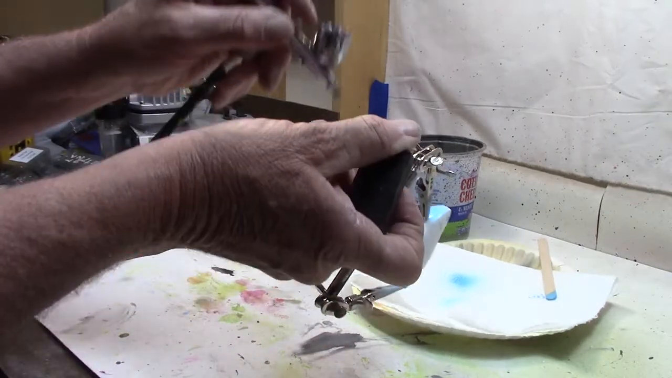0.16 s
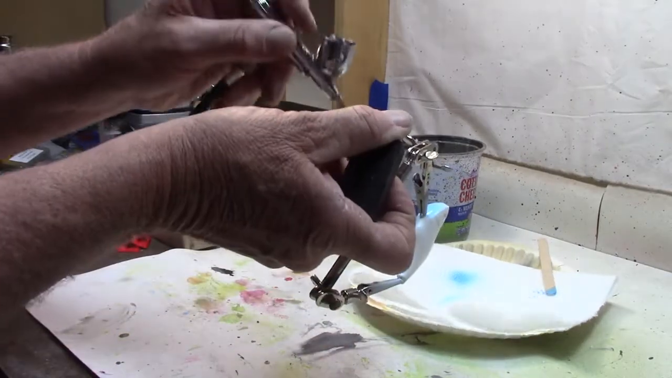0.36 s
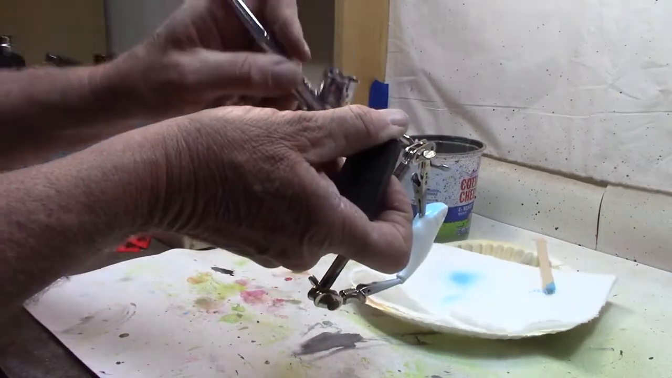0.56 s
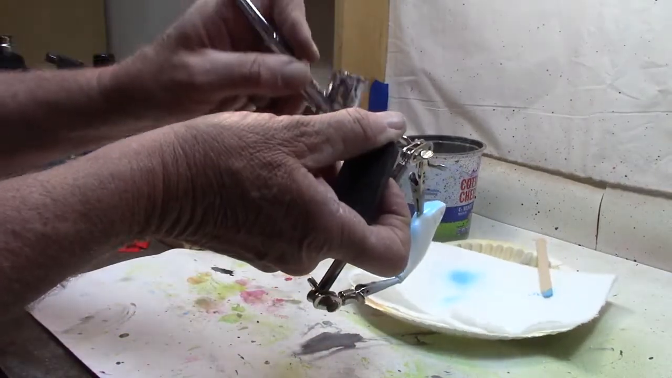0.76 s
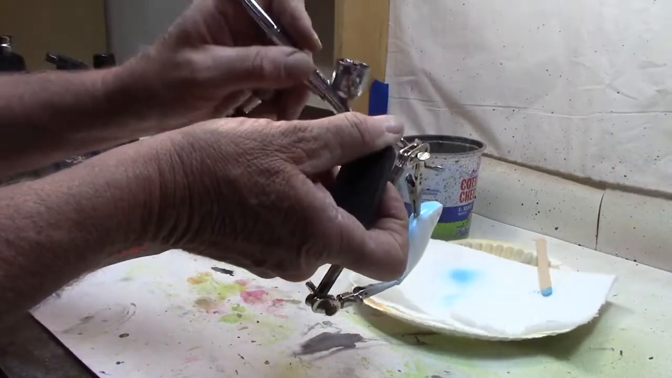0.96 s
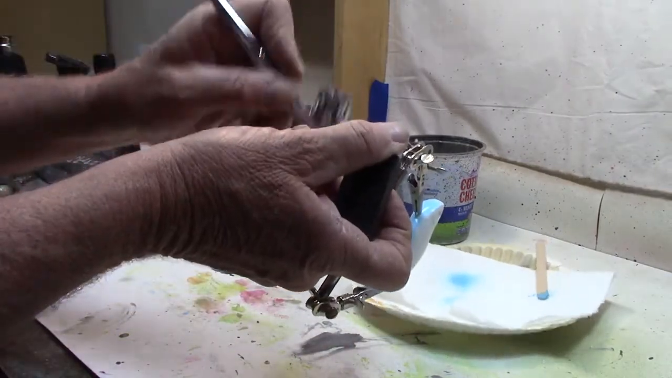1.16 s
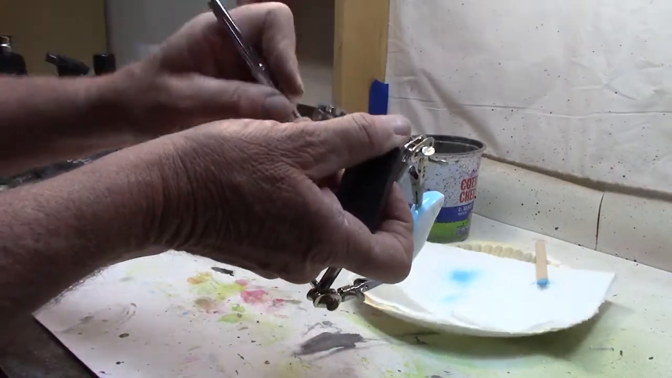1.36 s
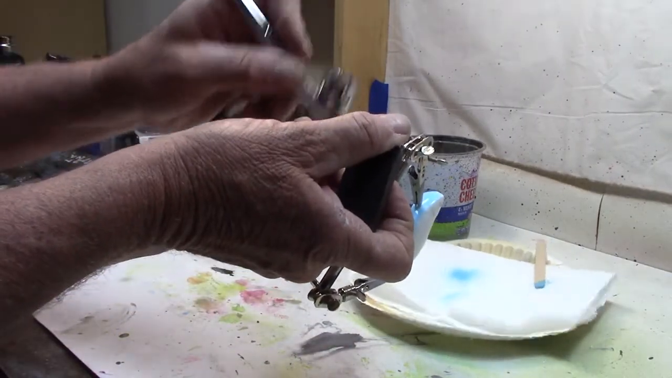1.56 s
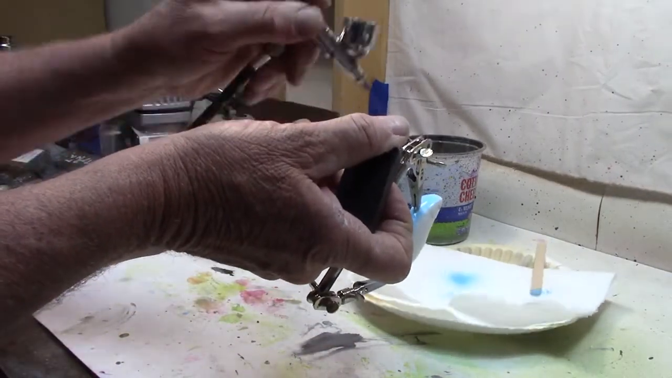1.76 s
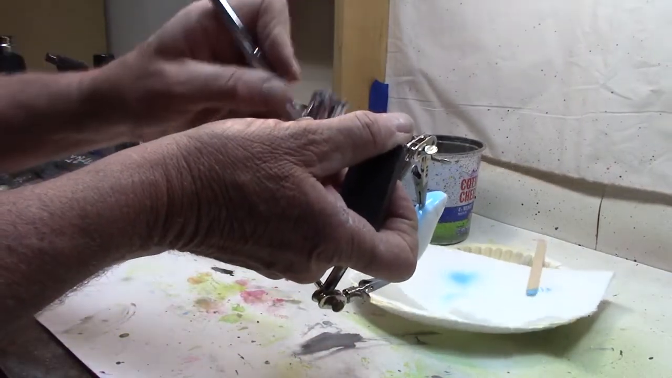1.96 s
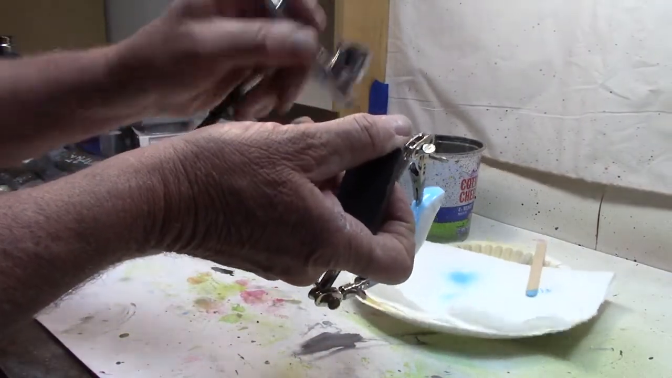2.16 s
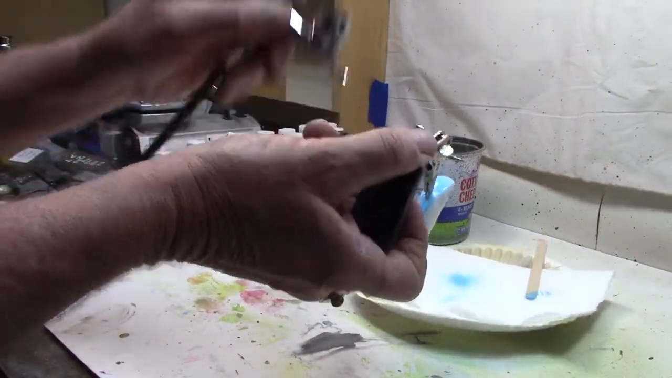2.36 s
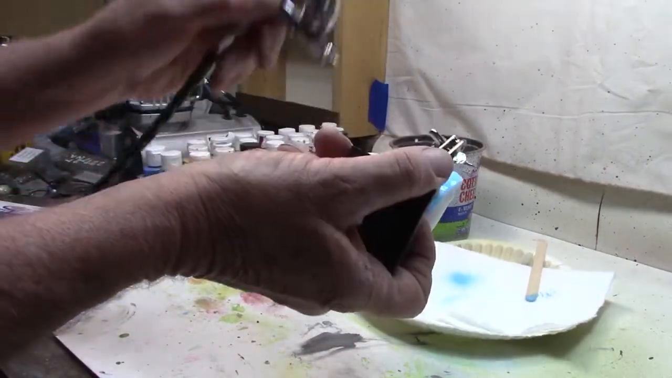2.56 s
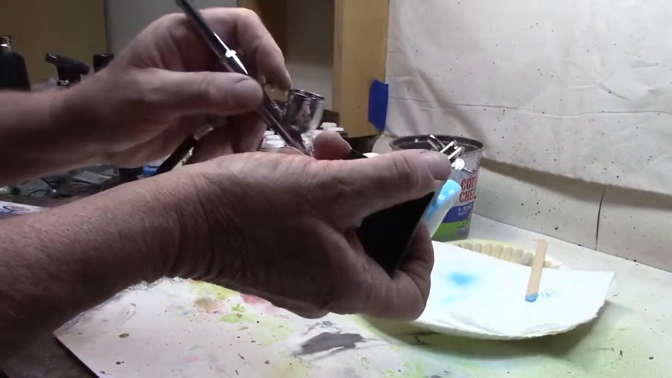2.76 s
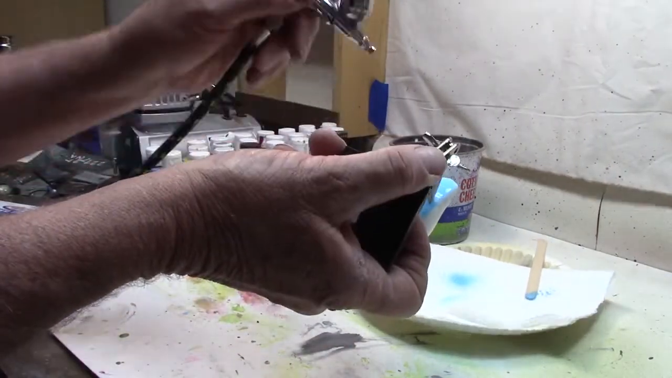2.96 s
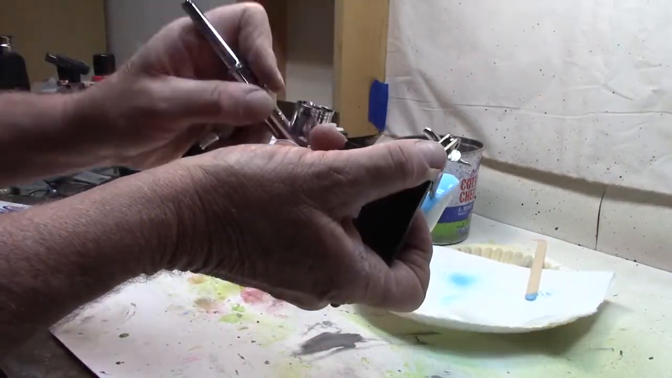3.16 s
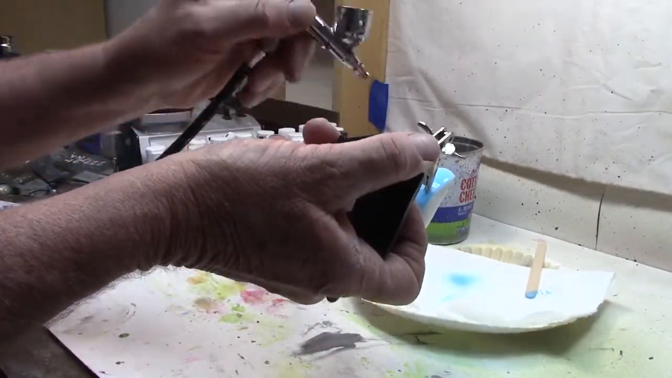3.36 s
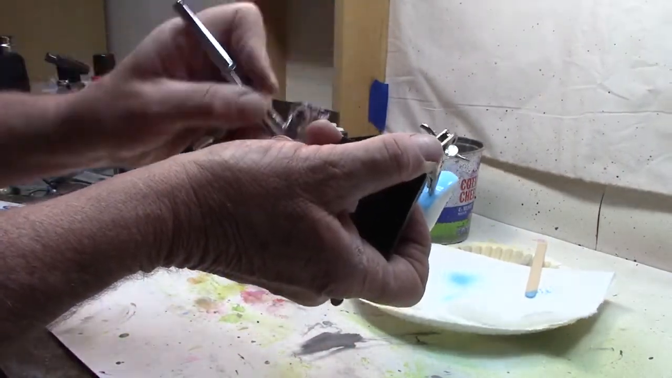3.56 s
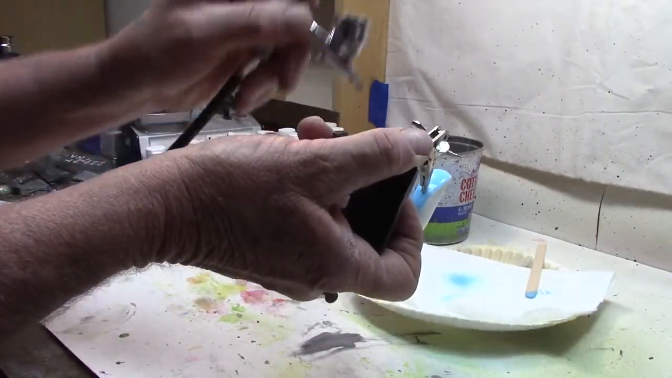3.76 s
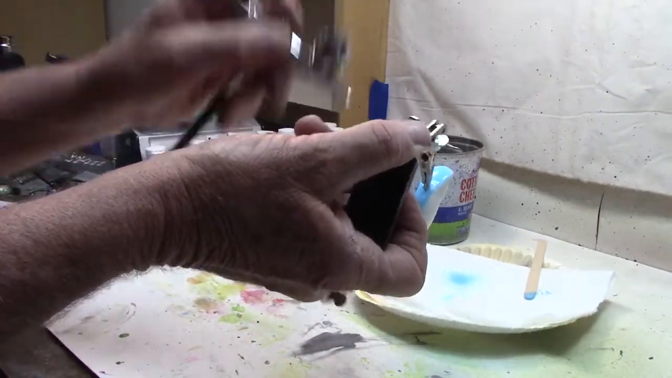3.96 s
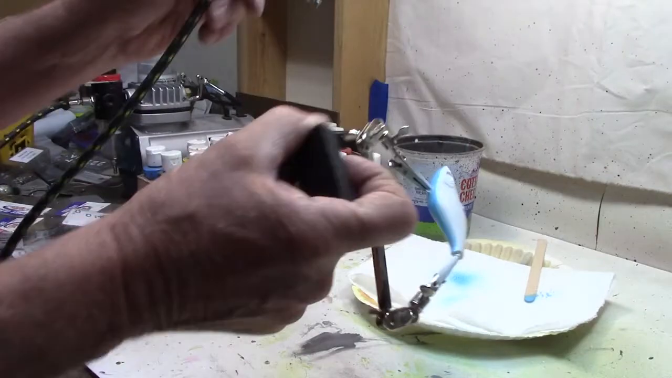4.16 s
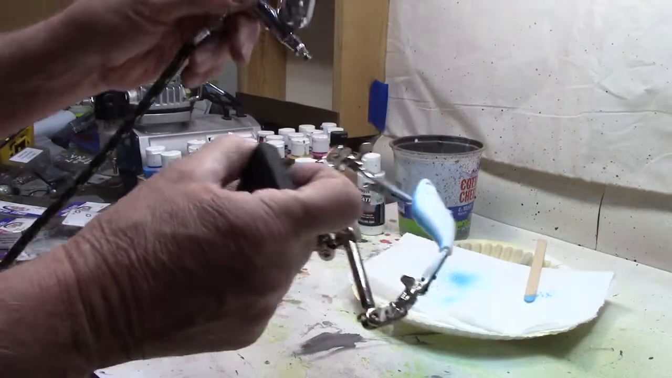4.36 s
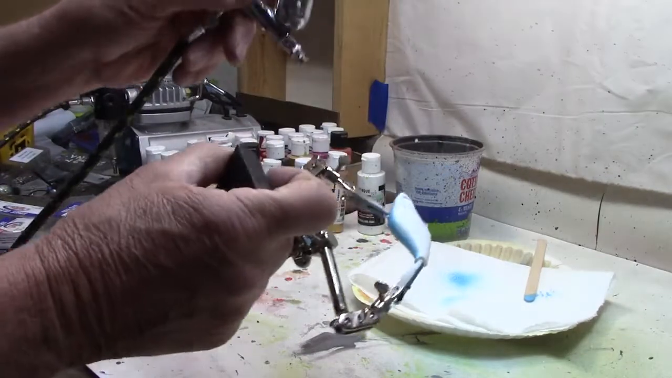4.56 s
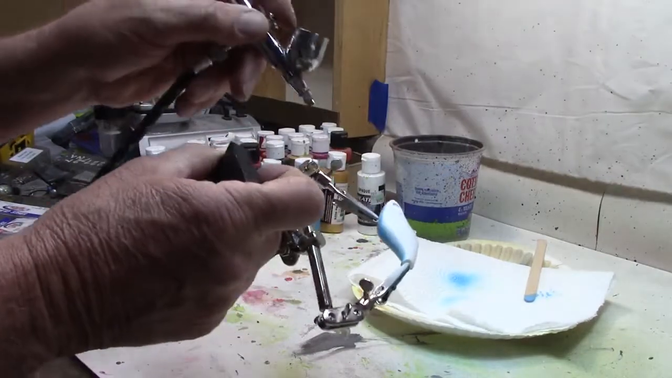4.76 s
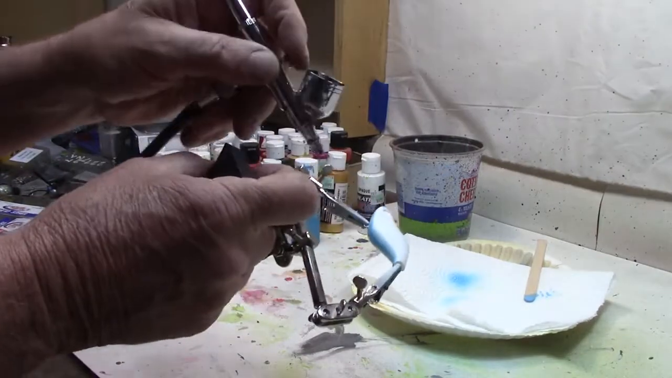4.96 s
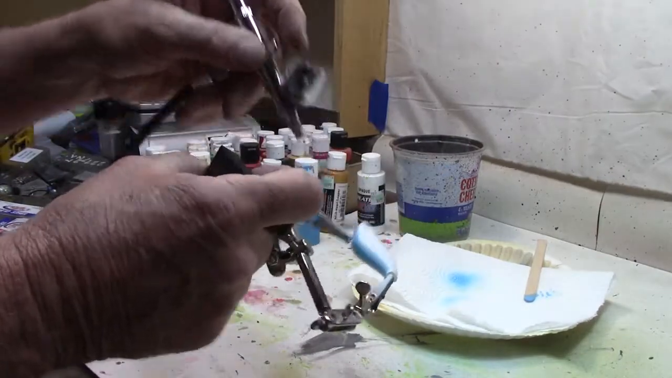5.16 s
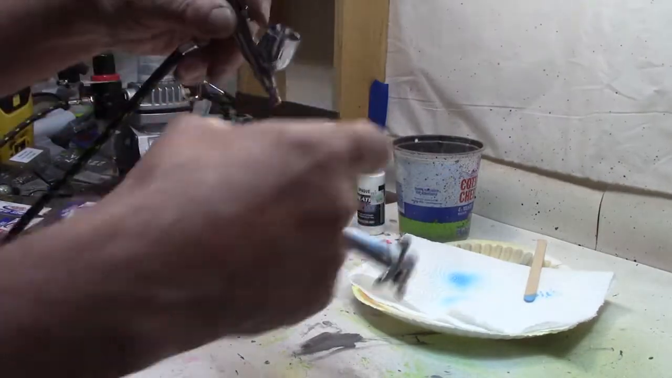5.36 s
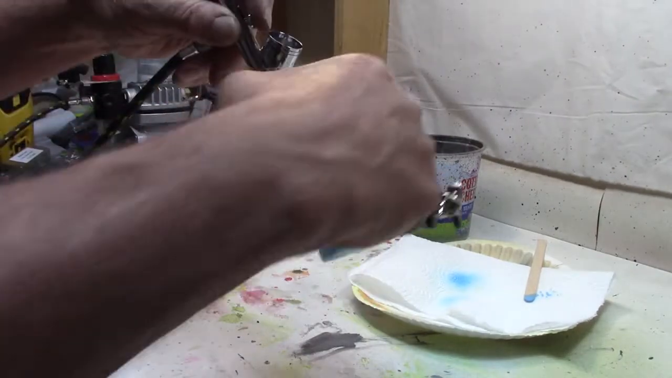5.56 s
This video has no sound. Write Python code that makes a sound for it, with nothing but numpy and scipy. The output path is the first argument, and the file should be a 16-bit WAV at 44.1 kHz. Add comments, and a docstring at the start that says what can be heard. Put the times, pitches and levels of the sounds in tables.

```python
"""Compressor and airbrush

A small piston compressor chugs beside a workbench: each turn of its crank thumps the housing, rings
the air line and puffs through the valves. An airbrush hisses two long bursts at a part held in the
hand, and its trigger snaps back after each. Then the motor is switched off, the piston coasts through
a few slow strokes and a metal clamp clicks as it is put down."""
import sys
import numpy as np
from scipy import signal
from scipy.fft import rfft, irfft, next_fast_len
from scipy.io import wavfile
from scipy.ndimage import uniform_filter1d

SR = 44100
rng = np.random.default_rng(int(sys.argv[2]) if len(sys.argv) > 2 else 0)


def wrap_up_sound(samples):
    """Save the sound to the file named by the first command line argument, as 16-bit audio."""
    columns = np.atleast_2d(samples).T
    # keep every value between -1 and 1, then stretch to whole-number steps
    tamed = np.clip(columns, -1, 1)
    steps = np.round(tamed * 32767).astype(np.int16)
    wavfile.write(sys.argv[1], SR, steps)


N = 246959
TIME = np.arange(N) / SR
OPPOSITE = np.array([[1], [-1]])  # adds to the left channel, subtracts from the right


def from_db(db):
    """Turn decibels into a gain."""
    return 10 ** (np.asarray(db) / 20)


def rms_one(x):
    """Scale a signal to an average power of 1."""
    return x / np.sqrt(np.mean(x ** 2) + 1e-20)


def in_time(rows):
    """Join timed rows with straight lines, giving one curve for each column after the time."""
    times, *columns = np.transpose(rows)
    return [np.interp(TIME, times, column) for column in columns]


def swells(rows):
    """Smooth bumps, each with its own middle, half length and height."""
    return sum(height * np.exp(-((TIME - middle) / half) ** 2) for middle, half, height in rows)


def dying(start, t60):
    """A level that jumps to 1, then falls 60 dB in t60 seconds."""
    return (TIME >= start) * from_db(-60 * np.clip((TIME - start) / t60, 0, 3))


def noise(colour):
    """Noise of power 1, shaped by rows of frequency and relative level."""
    hz, db = np.transpose(colour)
    size = next_fast_len(N)
    freqs = np.fft.rfftfreq(size, 1 / SR) + 1
    roll_off = 1 / (1 + (hz[0] / 2 / freqs) ** 4) / (1 + (freqs / hz[-1] / 2) ** 4)
    gain = roll_off * from_db(np.interp(np.log(freqs), np.log(hz), db))
    return rms_one(irfft(gain * rfft(rng.standard_normal(size)))[:N])


def ring(drive, hz, t60):
    """Two coupled resonators: a click swells into a tone and dies away. The pitch may move."""
    spin = np.exp(2j * np.pi * np.cumsum(hz * np.ones(N)) / SR)
    decay = from_db(-60 / (t60 * SR))
    envelope = signal.lfilter([np.e * (1 - decay)], [1, -2 * decay, decay * decay], drive / spin + 1e-18)
    return np.real(spin * envelope)


def air_ring(hz, t60):
    """A tone of power 1, kept ringing by rushing air."""
    return rms_one(ring(rng.standard_normal(N), hz, t60))


def strokes(turns, angle, uneven_db):
    """One click each time the crank passes an angle; uneven_db varies their strength."""
    clicks = np.diff(np.floor(turns - angle), prepend=np.floor(turns[0] - angle))
    clicks[clicks > 0] = from_db(uneven_db * rng.standard_normal(np.count_nonzero(clicks)))
    return clicks


def knocks(turns, force, tones, uneven_db):
    """Tones struck once a turn, each at its own crank angle."""
    return sum(from_db(db) * ring(force * strokes(turns, angle, uneven_db), hz, t60)
               for angle, hz, t60, db in tones)


def puff(turns, opens, peak_after, uneven_db):
    """Flow through a valve that opens once a turn: it swells to about 1 and dies away."""
    count, age = np.divmod(turns - opens + 1, 1)
    strength = from_db(uneven_db * rng.standard_normal(size=200))[count.astype(int)]
    return strength * (age / peak_after * np.exp(1 - age / peak_after)) ** 2


TURNS_PER_S, SAG_TURNS_PER_S, START_TURNS = 27.58, 0.32, -0.332
OFF_S, STALL_S, COAST_TURNS_PER_S, BRAKE_TURNS_PER_S2 = 5.07, 5.42, 16.4, 23.5

def crank():
    """Turns so far and share of full speed: the motor sags as pressure builds, then coasts and stalls."""
    running = TURNS_PER_S - SAG_TURNS_PER_S * (TIME / OFF_S) ** 2
    coasting = (COAST_TURNS_PER_S - BRAKE_TURNS_PER_S2 * (TIME - OFF_S)) * (TIME < STALL_S)
    rate = np.where(TIME < OFF_S, running, coasting)
    speed = np.abs(uniform_filter1d(rate / TURNS_PER_S, SR // 20))
    return START_TURNS + np.cumsum(rate) / SR, speed


# The housing's thump and boom. Each row: crank angle in turns, pitch in Hz, ring time in seconds,
# relative level in dB.
HOUSING_TONES = [(-0.176, 254.7, 0.027, -29.5), (-0.23, 154.1, 0.041, -31), (-0.222, 228.5, 0.038, -27.5),
                 (-0.1993, 403, 0.061, -34), (0.0832, 250, 0.0063, -23.5)]
BOOM_TONES = [(-.25, 115, 0.039, -36.5), (-.22, 217, 0.1, -42)]
# The boom grows as the hand lifts away. Each row: middle and half length in seconds, gain.
BOOM_SWELL = [(4.8, 0.39, 1.0)]
SETTLE_DB, SETTLE_S = 3.5, 0.99

def housing(turns, speed, shade_db):
    """The piston thumps the housing, harder at first. Slow, soft blows lose their higher tones most."""
    thump = sum(knocks(turns, speed ** (hz / 215), [(angle, hz, t60, db)], uneven_db=0.55)
                for angle, hz, t60, db in HOUSING_TONES)
    thump_db = -0.5 + SETTLE_DB * np.exp(-TIME / SETTLE_S) - 0.07 * shade_db
    boom = swells(BOOM_SWELL) * knocks(turns, speed ** 3, BOOM_TONES, uneven_db=2.0)
    return from_db(thump_db) * thump + boom


def drone(turns, speed, shade_db):
    """The strokes keep a tone ringing, a little lower when shaded; rushing air makes it waver."""
    pushes = speed ** 3 * strokes(turns, angle=-0.28945, uneven_db=0.0)
    tone = from_db(-19.2 - 0.9 * shade_db) * ring(pushes, hz=582.2 - 1.75 * shade_db, t60=0.049)
    waver = from_db(-40.5 - 0.4 * shade_db) * speed ** 2.2 * air_ring(hz=560, t60=0.052)
    return tone + waver


# Tones along the air's path. Each row: crank angle in turns, pitch in Hz, ring time in seconds,
# relative level in dB.
OUTLET_TONES = [(-0.25365, 596.8, 0.025, -23), (-.299, 691.3, 0.02, -26.5)]
INTAKE_TONES = [(-.587, 922.5, 0.045, -36), (-.494, 990.5, 0.02, -35.5)]
REED_TONES = [(-.181, 2118, 0.014, -35), (-.112, 2021, 0.02, -36.5), (0.088, 2113, 0.01, -44),
              (-.212, 1700, .006, -43.5), (-0.096, 1991, 0.065, -43), (-0.14, 3540, .03, -55)]

def air_line(turns, speed, shade_db):
    """Each turn rings the outlet, the intake and the valve's reed, more weakly as the crank slows."""
    outlet = knocks(turns, speed ** 2.2, OUTLET_TONES, uneven_db=1.05)
    intake = knocks(turns, speed ** 1.9, INTAKE_TONES, uneven_db=1.0)
    reed = knocks(turns, speed ** 2.3, REED_TONES, uneven_db=1.8)
    return outlet + from_db(3.5 - 0.67 * shade_db) * intake + from_db(-0.15 * shade_db) * reed


# The bench's hum. Each row: multiple of the crank speed, level at full speed in dB.
BENCH_TONES = [(1, -34), (2, -51), (3, -53)]

def bench(turns, speed):
    """The bench shakes in step with the crank."""
    return speed ** 4 * sum(from_db(db) * np.sin(2 * np.pi * k * turns) for k, db in BENCH_TONES)


# How well the pump is heard past the arms. Each row: time in seconds, relative level in dB.
PAST_ARMS = [(0.05, -28), (1.05, -28), (2.38, -28), (2.74, -36), (3.46, -38.5), (3.89, -31), (4.56, -42),
             (5.03, -32)]
# The echo off the arms. Each row: time in seconds, delay in milliseconds, share echoed.
ARM_ECHO = [(0, 5.4, 0.046), (2.3, 5.1, 0.054), (2.6, 4.47, 0.14), (3.9, 4.84, 0.28), (4.15, 5, 0.09),
            (4.45, 5.6, 0.092), (4.75, 6.7, 0.076), (5.05, 6.14, 0.065)]

def pump_behind_arms(turns, speed):
    """Moving arms shade the pump's sound; their shifting echo lifts some tones and hollows others."""
    level_db, = in_time(PAST_ARMS)
    shade_db = level_db.max() - level_db
    pump = housing(turns, speed, shade_db) + drone(turns, speed, shade_db)
    pump += air_line(turns, speed, shade_db) + bench(turns, speed)
    delay_ms, share = in_time(ARM_ECHO)
    return pump - share * np.interp(TIME - delay_ms / 1000, TIME, pump)


# The hiss of the valves. Each row: frequency in Hz, relative level in dB.
VALVE_COLOUR = [(1100, -1.5), (1600, 2.5), (2700, 0), (4000, -4), (4900, -4.5), (6000, -4), (8500, -9.5),
                (9800, -7.5), (12000, -23), (13000, -14), (15500, -28)]
# The cylinder head's tones. Each row: pitch in Hz, ring time in seconds, relative level in dB.
HEAD_TONES = [(3550, 0.015, -54), (4920, 0.0077, -57.5), (5370, 0.0083, -61.5), (6730, 0.0042, -63),
              (8340, .006, -57), (10490, 0.011, -56), (11400, .004, -66.5)]

def valve_air(turns, speed):
    """Each stroke pushes out a puff of hiss that rings the cylinder head."""
    hiss = from_db(-45.5) * noise(VALVE_COLOUR)
    head = sum(from_db(db) * air_ring(hz, t60) for hz, t60, db in HEAD_TONES)
    flow = 0.13 + puff(turns, opens=-0.18, peak_after=0.33, uneven_db=1.5)
    return (hiss + head) * speed ** 4 * flow


# The seal's squeaks. Each row: crank angle in turns, pitch in Hz, ring time in seconds, level in dB,
# late fade in dB per second (below zero it grows).
SEAL_TONES = [(-.15, 11600, 0.005, -50.5, 24), (-.06, 10630, 0.0089, -53, -3)]
# The squeak grows or dries up for a spell. Each row: middle and half length in seconds, change in dB.
SQUEAK_SWELLS = [(4.34, 0.27, 8), (4.78, 0.044, -5)]
SEAL_FADES_FROM_S = 4.48

def seal_squeak(turns, speed):
    """The piston's seal rubs on every stroke and squeaks high, then lower."""
    fading_s = np.maximum(TIME - SEAL_FADES_FROM_S, 0)
    squeak = 0
    for angle, hz, t60, db, fade_db_per_s in SEAL_TONES:
        rub = speed ** 5 * puff(turns, opens=angle, peak_after=0.13, uneven_db=1.5)
        squeak += from_db(db - fade_db_per_s * fading_s) * rms_one(rub * air_ring(hz, t60))
    return from_db(swells(SQUEAK_SWELLS)) * squeak


# The workshop's background. Each row: frequency in Hz, relative level in dB.
WORKSHOP_COLOUR = [(30, 19.5), (100, -1), (300, 6.5), (600, -4.5), (1200, -6), (3200, -9), (4600, -6),
                   (6000, -12.5), (10000, -21), (16000, -37)]

def workshop():
    """A faint, low rush, nearly the same on both sides."""
    return from_db(-51.5) * noise(WORKSHOP_COLOUR) + from_db(-65.5) * noise(WORKSHOP_COLOUR) * OPPOSITE


# The bursts. Each row: when the air opens, the pull is halfway and the air is shut, all in seconds,
# then relative level in dB.
BURSTS = [(0.185, 0.464, 2.374, 0), (2.805, 2.84, 3.986, -0.07)]
OPEN_S, PULL_S, SHUT_S = 0.0052, 0.09, 0.02

def trigger():
    """Press for air, pull for paint: gives how open the valve is and the share of pull still to go."""
    valve, unpulled = 0, 0
    for opens, pulled, shuts, db in BURSTS:
        held = np.clip((TIME - opens) / OPEN_S, 0, 1) * np.clip((shuts - TIME) / SHUT_S, 0, 1)
        valve += from_db(db) * held
        unpulled += (held > 0) * np.clip(0.5 - (TIME - pulled) / PULL_S, 0, 1)
    return valve, unpulled


# The jet's sweeps over the part. Each row: middle and half length in seconds, rise of paint hiss in dB.
PASSES = [(.56, 0.1, 6), (.85, 0.25, 7.5), (1.14, .08, 6.5), (1.38, 0.12, 8.5), (1.63, 0.1, 8.5),
          (1.95, 0.14, 8.5), (2.28, 0.11, 9.5), (2.885, 0.053, 7.5), (3.18, 0.2, 10.5), (3.56, 0.15, 11),
          (3.91, 0.099, 9.5)]
# The top of the hiss flares up. Each row: middle and half length in seconds, level in dB.
FLARES = [(.9, .15, -32.5), (2.985, .06, -28)]
# The spray's four noises. Each row: frequency in Hz, relative level in dB.
IMPACT_COLOUR = [(100, -5), (200, 1.5), (450, 5), (800, 3), (1400, 0), (2500, -0.5), (4000, -3.5),
                 (7000, -2.5)]
PAINT_COLOUR = [(3500, -14), (4700, -11.5), (5400, 5.5), (6600, 5), (7600, -3.5), (9500, -23.5),
                (14000, -21.5)]
NOZZLE_COLOUR = [(1000, -94), (2700, -7), (4300, 0), (6000, 0), (8200, 5), (10000, 5.5), (12000, 2.5),
                 (14000, 0.5), (16000, -2.5)]
FLARE_COLOUR = [(5000, -25), (8500, -3), (11500, 2), (14000, -1), (16000, -11)]

def spray():
    """Air and paint hiss from the nozzle; the jet rushes against the part and rings the cupped hand."""
    valve, unpulled = trigger()
    pass_db = swells(PASSES) * (1 - unpulled)
    paint_db = -37.5 - 2.5 * unpulled + pass_db
    impact = from_db(-33 - 6.5 * unpulled + 0.44 * pass_db) * noise(IMPACT_COLOUR)
    paint = from_db(paint_db) * noise(PAINT_COLOUR)
    nozzle = from_db(-27 - 6 * unpulled - 0.04 * pass_db) * noise(NOZZLE_COLOUR)
    flare = swells([(middle, half, from_db(db)) for middle, half, db in FLARES]) * noise(FLARE_COLOUR)
    cupped_hand = from_db(paint_db - 15) * air_ring(hz=2664, t60=0.017)
    return valve * (impact + paint + nozzle + flare + cupped_hand)


# The trigger's hits. Each row: start in seconds, crack level in dB, ring level in dB.
SNAPS = [(2.3856, -9, -7.5), (2.3883, -11.5, -12), (2.395, -28, -16.5), (4.0037, -12, -12.5),
         (4.0052, -13.5, -20), (4.013, -17, -28)]
# The airbrush's metal body. Each row: pitch in Hz, relative level in dB, ring time in seconds.
BODY_TONES = [(2045, -20, 0.054), (3093, -17.5, 0.068), (4200, -15, 0.12), (4280, -27, 0.048),
              (5760, -27, .05), (9340, -16.5, 0.27), (12120, -21, 0.047)]
# The crack. Each row: frequency in Hz, relative level in dB.
CRACK_COLOUR = [(1200, -34.5), (2000, -7), (3200, 10), (4400, 1.5), (5300, -2.5), (6400, -1), (8000, -6),
                (10000, -4), (12000, 6.5), (13500, -7), (16000, -18.5)]

def trigger_snaps():
    """The trigger springs back with a crack, bounces and rings the body until the finger damps it."""
    hits, age = np.zeros(N), TIME[:SR // 8]
    crack = 0
    for start, crack_db, ring_db in SNAPS:
        hits[round(start * SR)] = from_db(ring_db)
        crack += from_db(crack_db) * (dying(start, t60=0.0052) + 0.13 * dying(start, t60=0.067))
    body = sum(from_db(db - 60 * age / t60) * np.sin(2 * np.pi * hz * age) for hz, db, t60 in BODY_TONES)
    finger = np.exp(-(age / 0.036) ** 4)
    return crack * noise(CRACK_COLOUR) + signal.oaconvolve(hits, body * finger)[:N]


# Light clicks. Each row: start in seconds, level in dB, fade time in seconds.
CLICKS = [(4.1173, -26, 0.036), (4.136, -36, 0.033), (4.2, -34.5, 0.074), (4.489, -31, 0.027),
          (4.674, -34, 0.029), (5.05, -22, 0.044), (5.067, -35, .06), (5.46, -31.5, 0.028),
          (5.5554, -34.5, 0.038)]
# Their brightness. Each row: frequency in Hz, relative level in dB.
CLICK_COLOUR = [(1500, -31), (2500, -9), (4000, -11), (5500, -3.5), (7000, 2), (8800, 1), (10500, -6),
                (13000, -18), (16000, -19)]

def clamp_and_switch():
    """Small metal parts touch, each with a short, bright click."""
    return sum(from_db(db) * dying(start, t60) for start, db, t60 in CLICKS) * noise(CLICK_COLOUR)


def room(x, t60):
    """A wash of echoes from bench and walls, slightly different on each side."""
    age = TIME[:SR // 2]
    tails = rng.standard_normal((2, len(age))) * from_db(-60 * age / t60) * (age > 0.003)
    tails /= np.sqrt(np.sum(tails[0] ** 2))
    mid, side = signal.fftconvolve(x[None], tails, axes=1)[:, :N]
    return mid + 0.077 * side * OPPOSITE


WALL_DB, WALL_ABOVE_HZ, WALL_LAG_S = -19, 5600, 0.012

def with_wall_echo(x):
    """The treble bounces off a wall and reaches left and right with opposite signs."""
    treble = signal.sosfilt(signal.butter(6, WALL_ABOVE_HZ, "high", fs=SR, output="sos"), x)
    echo = np.pad(treble, (round(WALL_LAG_S * SR), 0))[:N]
    return x + from_db(WALL_DB) * echo * OPPOSITE


def scene():
    """Everything sits close by, near the middle of a small room."""
    turns, speed = crank()
    pump = pump_behind_arms(turns, speed) + valve_air(turns, speed) + seal_squeak(turns, speed)
    handling = trigger_snaps() + clamp_and_switch()
    echoes = room(from_db(-14.5) * pump + from_db(-18) * handling, t60=0.36)
    return workshop() + with_wall_echo(pump + spray() + handling) + echoes


# The tones a microphone's grille lifts. Each row: frequency in Hz, width in Hz, boost in dB.
GRILLE_PEAKS = [(2760, 150, 0), (3650, 200, 1), (4810, 99, 2), (5760, 200, 2), (6760, 100, 3.5),
                (7680, 120, 3.5), (8630, 390, 3), (11550, 160, 1)]
LOW_CUT_HZ, HIGH_CUT_HZ = 121, 15800

def record(dry):
    """The grille colours the treble, the deep bass is filtered out and the top is cut steeply."""
    for hz, width, db in GRILLE_PEAKS:
        band = signal.lfilter(*signal.iirpeak(hz, hz / width, fs=SR), dry)
        dry = dry + (from_db(db) - 1) * band
    dry = signal.sosfilt(signal.butter(2, LOW_CUT_HZ, "high", fs=SR, output="sos"), dry)
    return signal.sosfilt(signal.ellip(12, 0.1, 80, HIGH_CUT_HZ, fs=SR, output="sos"), dry)


dry = scene()
out = record(dry)
wrap_up_sound(out)
```